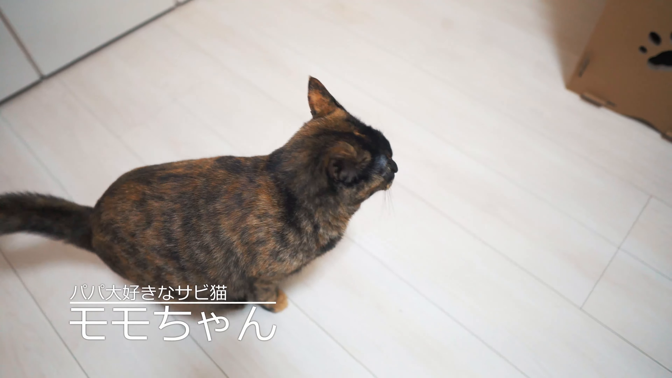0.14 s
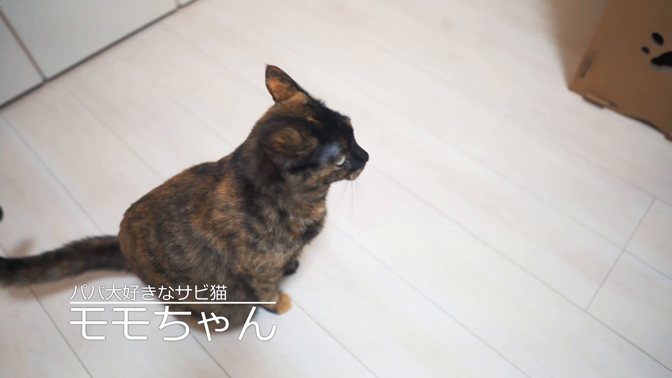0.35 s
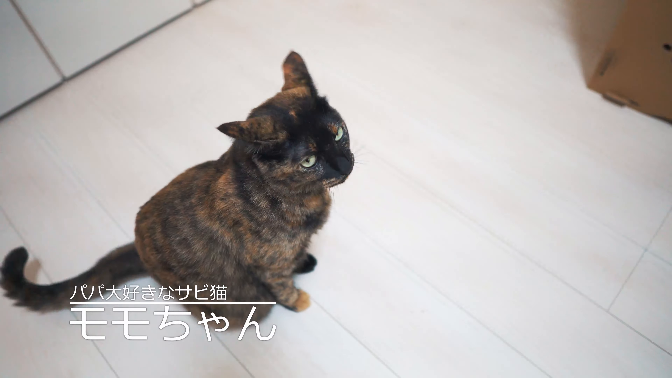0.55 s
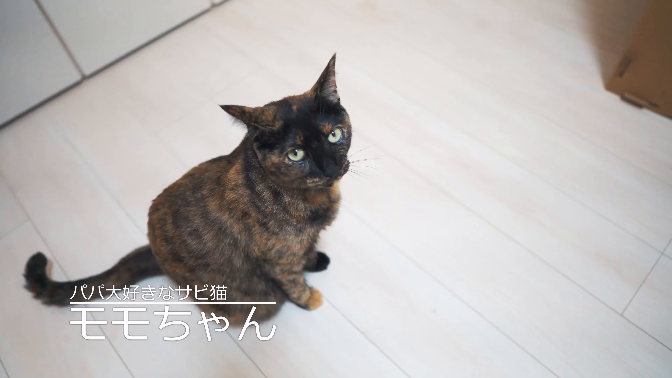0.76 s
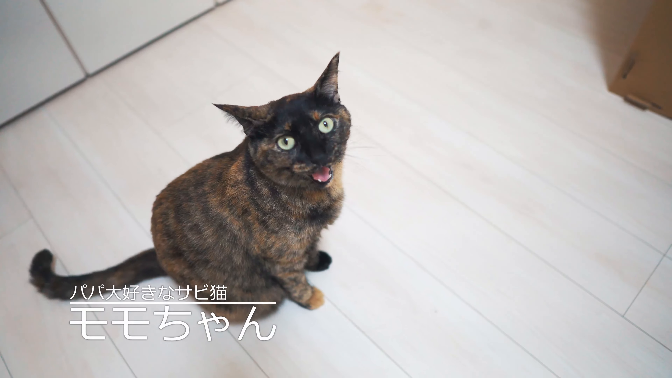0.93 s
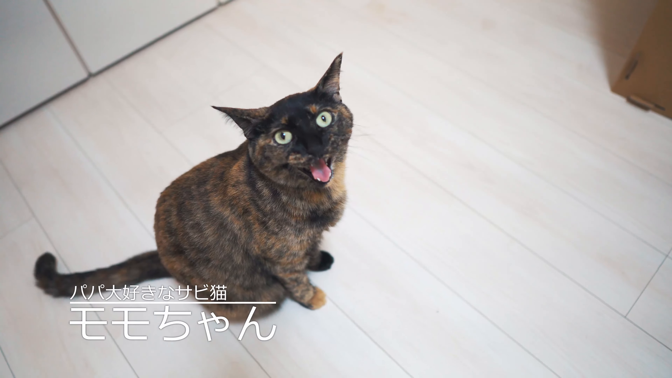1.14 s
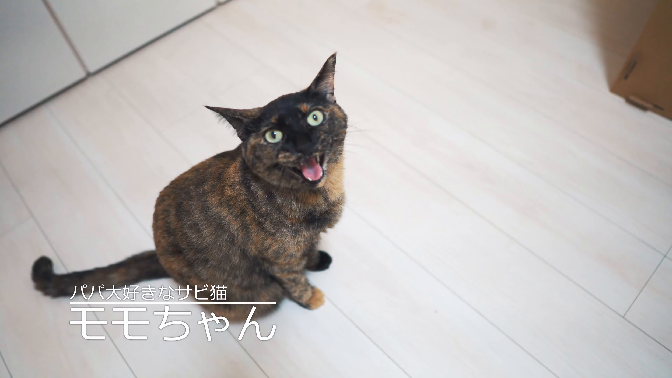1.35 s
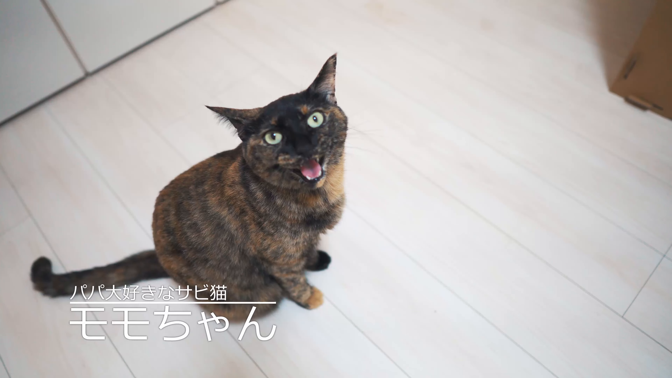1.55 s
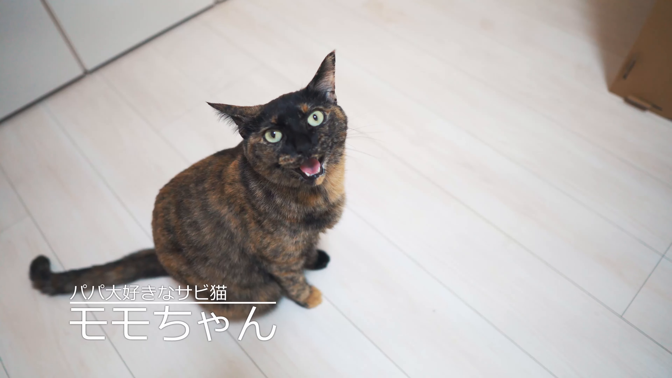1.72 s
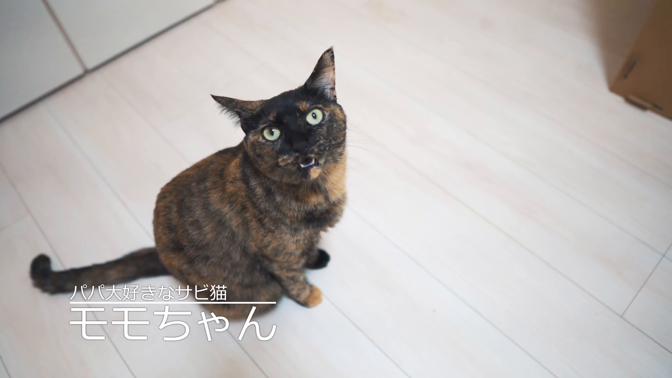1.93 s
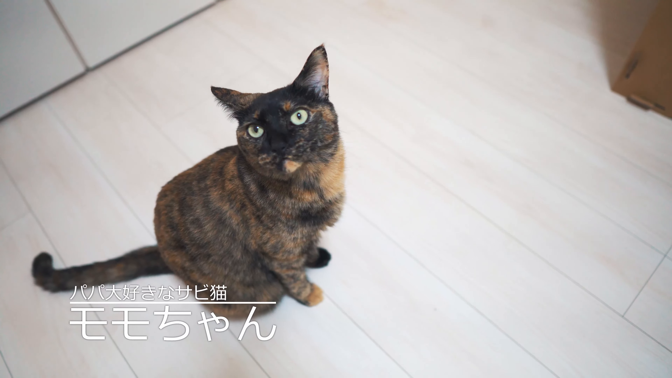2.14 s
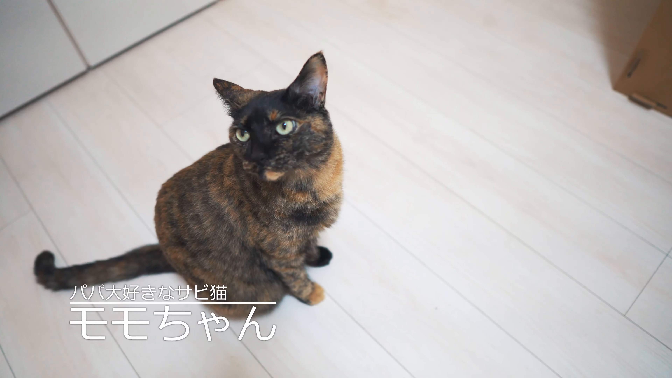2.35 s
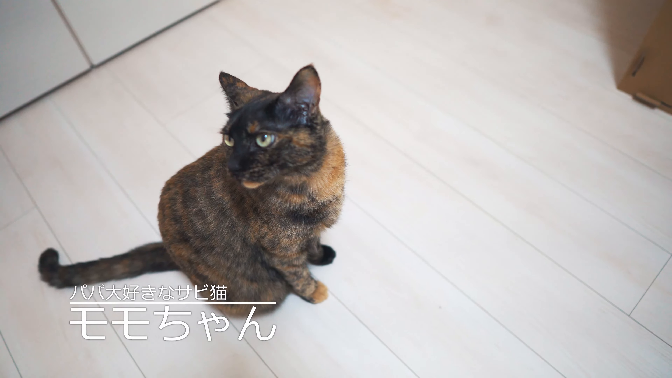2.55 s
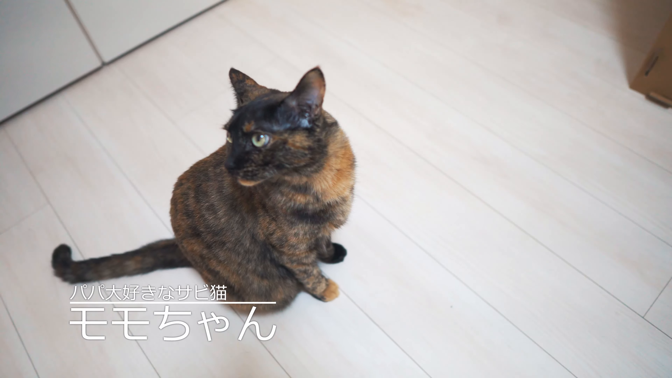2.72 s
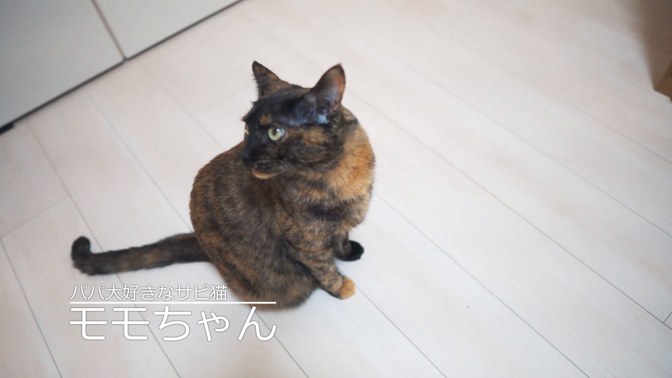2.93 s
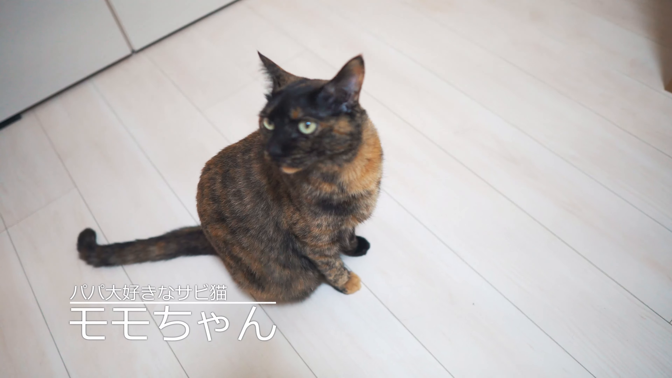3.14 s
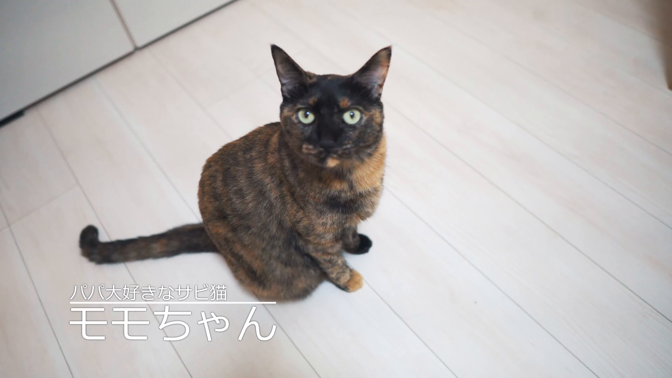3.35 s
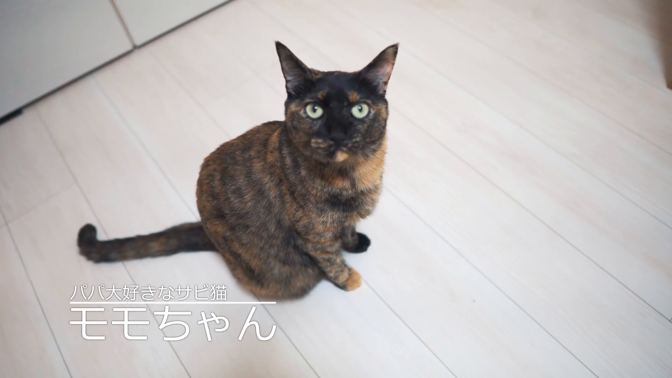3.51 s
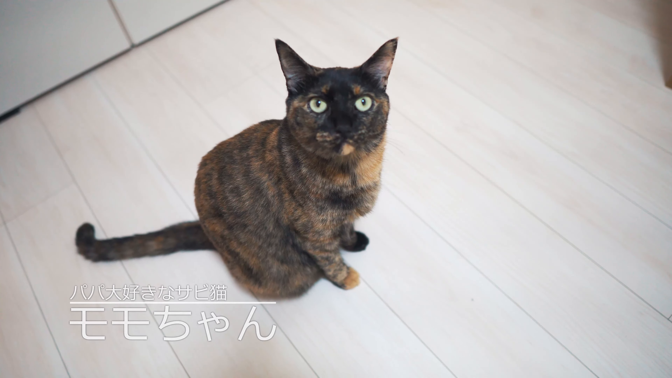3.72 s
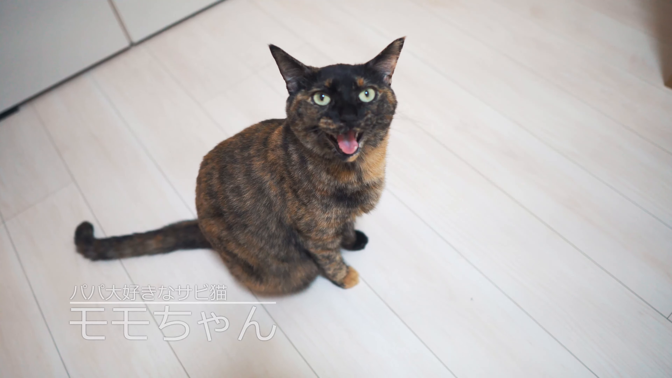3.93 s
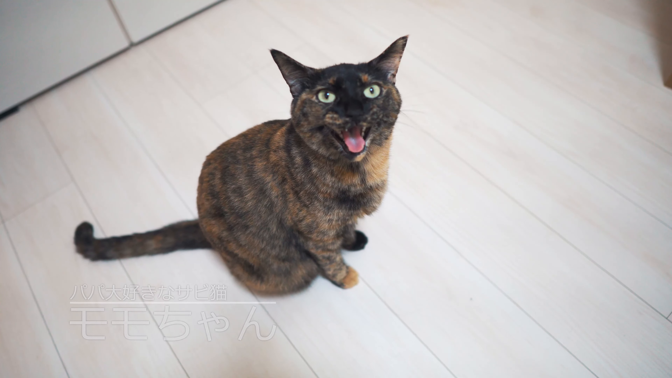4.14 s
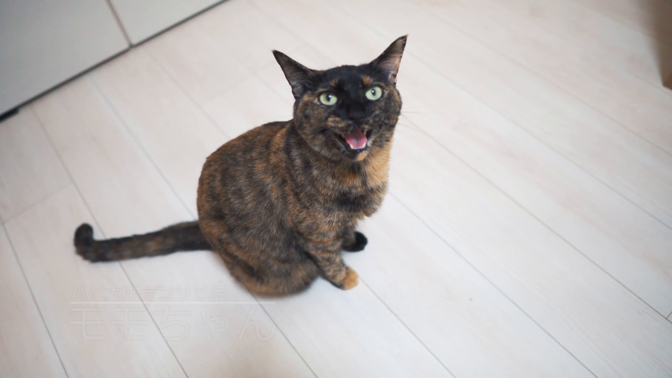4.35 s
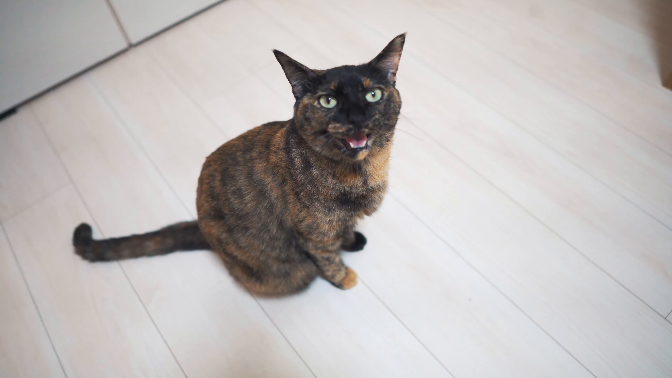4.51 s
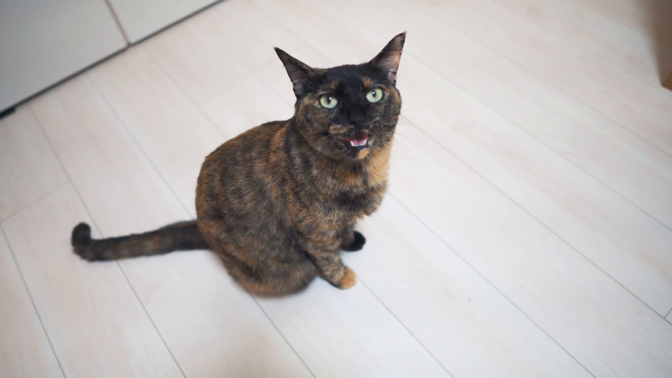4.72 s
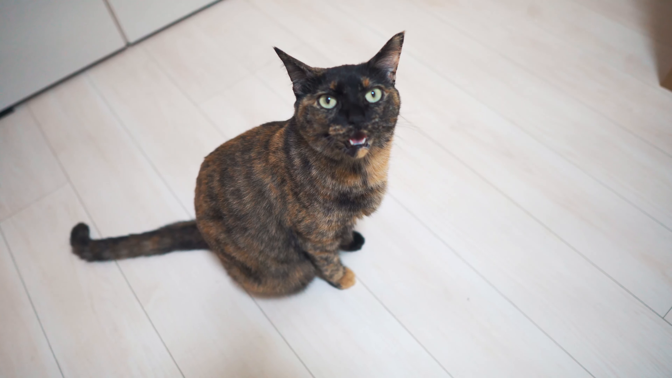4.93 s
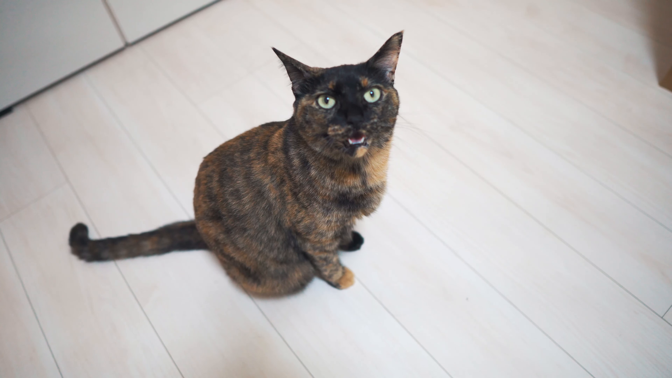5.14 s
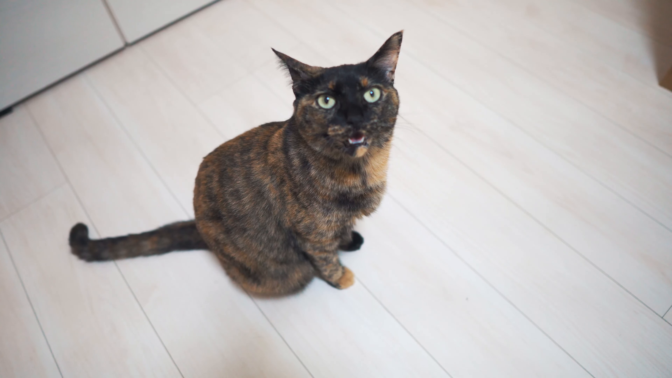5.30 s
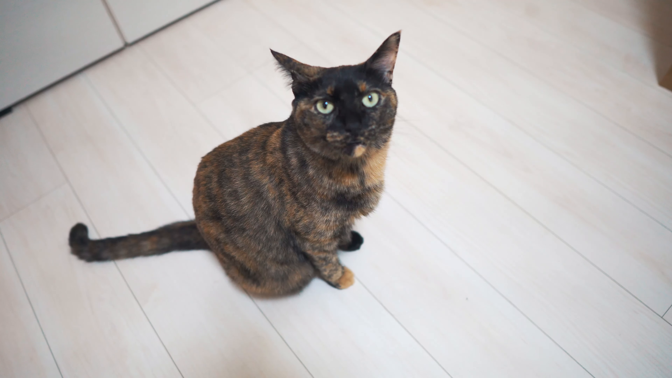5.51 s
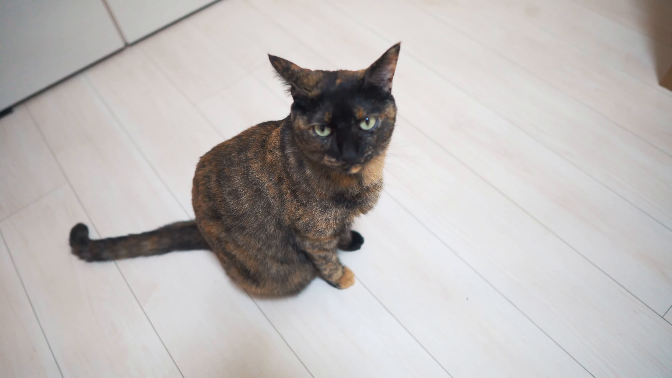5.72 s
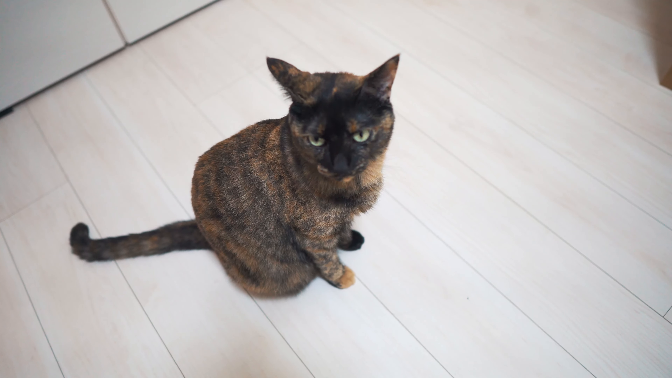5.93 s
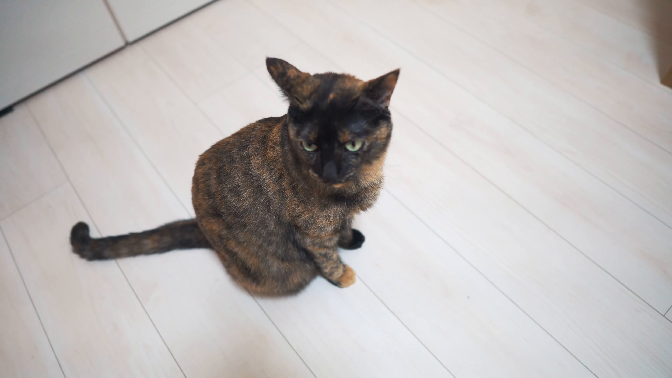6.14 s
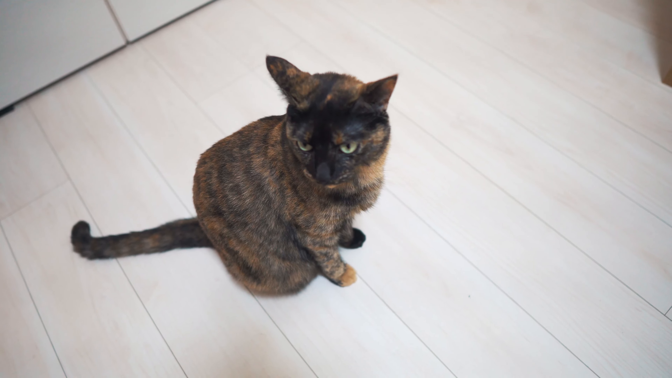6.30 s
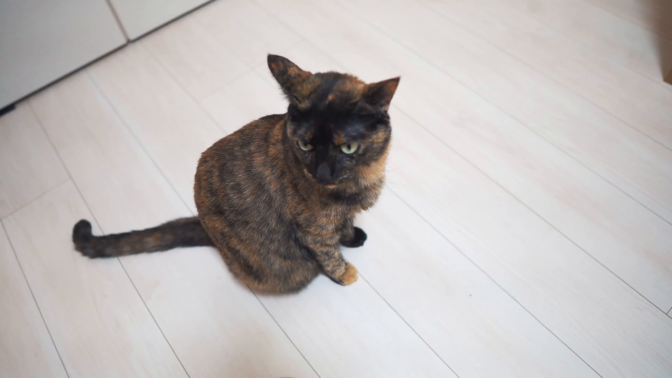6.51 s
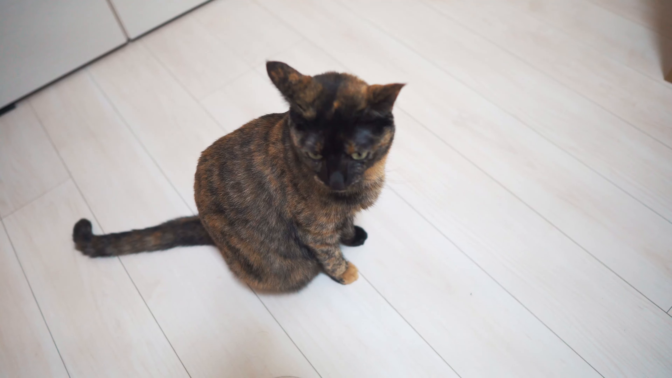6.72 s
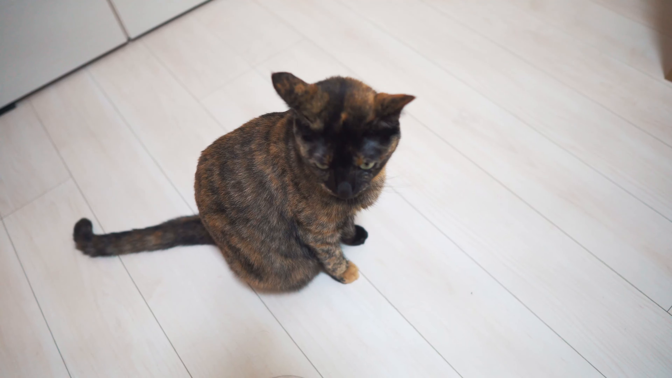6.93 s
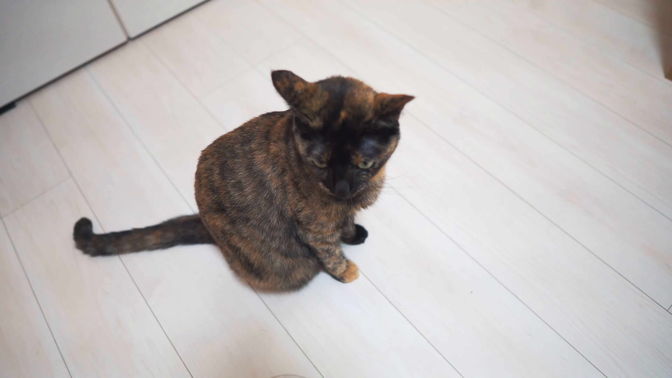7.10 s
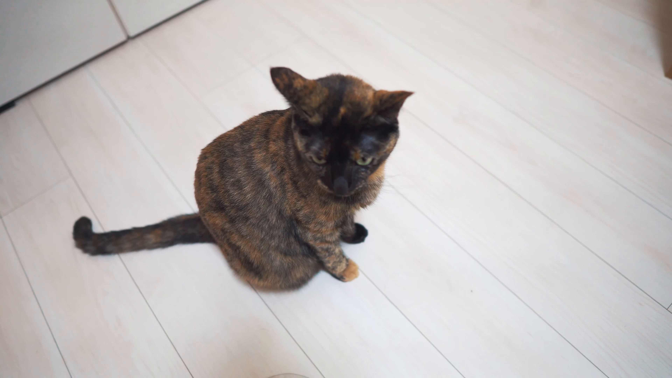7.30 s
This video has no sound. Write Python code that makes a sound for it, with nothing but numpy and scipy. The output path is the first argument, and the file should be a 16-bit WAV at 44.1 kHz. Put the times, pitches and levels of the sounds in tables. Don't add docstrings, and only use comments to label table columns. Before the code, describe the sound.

Two drawn-out, fairly high cat meows in a quiet room, the first strong and sustained, the second falling and fading, over faint air hum.

```python
import sys
import numpy as np
from scipy import signal
from scipy.fft import rfft, irfft, next_fast_len
from scipy.io import wavfile
from scipy.ndimage import uniform_filter1d

SR = 44100
rng = np.random.default_rng(int(sys.argv[2]) if len(sys.argv) > 2 else 0)


def int16_out(signal):
    q = np.round(np.clip(np.atleast_2d(signal).T, -1, 1) * 32767)
    wavfile.write(sys.argv[1], SR, q.astype(np.int16))


def invert_db(x):
    u = np.asarray(x, float) / 20
    return 10 ** u


N = 324600
CUTOFF_HZ = 15850


def rms_one(x):
    return x / np.sqrt(np.mean(x ** 2) + 1e-20)


def in_time(rows, t):
    s, *columns = np.transpose(rows)
    return [np.interp(t, s, c) for c in columns]


def at_hz(points, hz):
    point_hz, point_db = np.transpose(points)
    return np.interp(np.log(hz), np.log(point_hz), point_db)


def drift(rate_hz, size):
    r = np.exp(-2 * np.pi * rate_hz / SR)
    settle = 9000
    noise = rng.standard_normal(size + settle)
    return rms_one(signal.lfilter([1], [1, -2 * r, r * r], noise)[settle:])


def peak(hz, centre_hz, width_hz):
    return 1 / (1 + (2 * (hz - centre_hz) / width_hz) ** 2)


def shaped_noise(gain_at):
    size = next_fast_len(N)
    hz = np.maximum(np.arange(size // 2 + 1) * SR / size, 1)
    return rms_one(irfft(rfft(rng.standard_normal(size)) * gain_at(hz), size)[:N])


def swell(t, s, length_s):
    return np.exp(-(2 * (t - s) / length_s) ** 2)


def swells_db(t, rows):
    return sum(db * swell(t, s, length_s) for s, db, length_s in rows)


def hum():
    # frequency [Hz], density [dB per Hz].
    hum_points = [(26, -55.5), (45, -16), (75, -6), (124, -15), (233, 0.5), (317, -10), (401, -7.5),
                  (431, -5), (464, -6.5), (731, -9), (1070, -17), (1500, -22), (1950, -47), (3300, -120)]
    # frequency [Hz], density [dB per Hz].
    hiss_points = [(900, -15.5), (1400, -2), (2500, -4.5), (3800, -8.5), (4500, -14), (5500, -10.5),
                   (6800, -18.5), (8500, -20), (10500, -27.5), (12500, -31), (15800, -38)]
    # centre [Hz], width [Hz], level [dB].
    duct_rows = [(275, 28, -41), (449.5, 63, -43)]
    # start [s], depth [dB], recovery [s].
    duck_rows = [
        (-.5, 3.5, 3),
        (1.05, 6.5, 3.1),
        (4.0, 4, 0.75),
    ]
    level_db, duck_s = -37, 0.056
    t = np.arange(N) / SR
    air = invert_db(5.5) * shaped_noise(lambda hz: invert_db(at_hz(hum_points, hz)) * (hz > hum_points[0][0]))
    air += invert_db(-5.0) * shaped_noise(lambda hz: invert_db(at_hz(hiss_points, hz)) * (hz > hiss_points[0][0]))
    for centre_hz, width_hz, duct_db in duct_rows:
        duct_gain = invert_db(duct_db + 34.0 + 2.0 * drift(1.5, size=N))
        air += duct_gain * shaped_noise(lambda hz: peak(hz, centre_hz, width_hz))
    duck_db = np.zeros(N)
    for s, depth_db, recovery_s in duck_rows:
        since_s = np.maximum(t - s, 0)
        duck_db += depth_db * (1 - np.exp(-since_s / duck_s)) * np.exp(-since_s / recovery_s)
    return invert_db(level_db - duck_db - 3.5 + 0.16 * drift(1.1, size=N)) * air


def shake():
    # centre [s], length [s], sway level [dB], knock level [dB].
    regrip_rows = [
        (0.214, 0.46, -24.5, -40),
        (0.705, 0.35, -28, -71),
        (1.046, .15, -31, -62),
        (1.667, .08, -49, -45.5),
    ]
    sway_hz, sway_db, sway_waver_db = 10.7, -42, 1.5
    knock_db, knock_waver_db = -56.5, 3.5
    t = np.arange(N) / SR
    sway_gain = invert_db(sway_db + sway_waver_db * drift(2.0, size=N))
    knock_gain = invert_db(knock_db + knock_waver_db * drift(2.2, size=N))
    for s, length_s, grip_sway_db, grip_knock_db in regrip_rows:
        bump = swell(t, s, length_s)
        sway_gain += invert_db(grip_sway_db) * bump
        knock_gain += invert_db(grip_knock_db) * bump
    rate_hz = sway_hz * (1 + 0.029 * drift(2.13, size=N))
    sway = np.sqrt(2) * np.cos(2 * np.pi * np.cumsum(rate_hz) / SR)
    return sway_gain * sway + knock_gain * shaped_noise(lambda hz: peak(hz, 30, 22) ** 2)


def ticks():
    # start [s], peak [dB].
    tick_rows = [
        (.832, -51),
        (.908, -42),
        (3.796, -53),
    ]
    out = np.zeros(N)
    tail = np.exp(-np.arange(200) / SR / 0.0008)
    for s, peak_db in tick_rows:
        start = round(s * SR)
        out[start:start + 200] += invert_db(peak_db) * tail * rng.standard_normal(200)
    return signal.sosfilt(signal.butter(2, 2500, "high", fs=SR, output="sos"), out)


def line_heights(hz, since_s, throat_hz, nose_hz, throat_db, levels_db, jaw, lips, tongue):
    # frequency [Hz], level [dB].
    edge_points = [(5500, -28.5), (6800, 2.5), (7800, -3.5), (8800, -1), (10000, 0.5), (11500, -9.5),
                   (13500, 0), (15500, -9.5)]
    chest_hz, chest_width_hz, chest_bright_db = 897, 2100, -2
    throat_width_hz = 1500 * (0.61 + 1.74 * (1 - 0.61) * lips)
    mouth_hz, mouth_width_hz = 2970 + 1300 * tongue, 2110
    nose_hz = nose_hz + 1970 * np.maximum(0.55 - lips, 0)
    edge_db_per_octave = 1.1 * (throat_db + 14) + 5 * (lips - 0.65)
    edge_db = at_hz(edge_points, hz) + edge_db_per_octave * np.log2(hz / 7000)
    shapes = [peak(hz, throat_hz, throat_width_hz) ** 3,
              peak(hz, chest_hz, chest_width_hz) ** 3 * invert_db(chest_bright_db * np.log2(hz / chest_hz)),
              peak(hz, mouth_hz, mouth_width_hz) ** 3,
              peak(hz, nose_hz, 1400) ** 2,
              invert_db(edge_db) * (hz > edge_points[0][0])]
    heights = 0
    for shape, level_db in zip(shapes, levels_db):
        heights = heights + invert_db(level_db) * shape / np.sqrt(np.sum(shape ** 2, axis=0) / 2)
    cavity_db = 11 * peak(hz, 1182, 68)
    notch_db = -13 * np.maximum(2 * jaw - 0.6, 0) * peak(hz, 1100, 51)
    waver_db = [0.22 * min(k, 9) * drift(30.0, size=len(since_s)) for k in range(1, len(hz) + 1)]
    return heights * invert_db(cavity_db + notch_db) * invert_db(waver_db)


def meow(rows, hook_hz):
    # centre [s], rise [dB], length [s].
    surge_rows = [
        (4.53, 4, .07),
        (5.0, 2.5, 0.076),
        (5.316, 4.5, 0.026),
    ]
    # centre [s], added nose level [dB], length [s].
    nasal_rows = [
        (1.12, 15.5, 0.19),
        (4.45, 7.5, 0.38),
        (5.36, 7.5, 0.21),
    ]
    # centre [s], added rasp [dB], length [s].
    catch_rows = [(1.04, 6, .012), (1.07, 7, .012), (1.19, 5, .015), (1.27, 4, .25), (1.322, 10, .028),
                  (1.375, 5, .015), (1.446, 10, .008), (1.871, 13, .007), (4.2, 4, .25), (4.655, 8, .008)]
    attack_s, attack_db = 0.0081, -3
    release_s, release_db_per_s = 0.03, 700
    start_s, close_s = rows[0][0], rows[-1][0]
    start, stop = round(start_s * SR), round((close_s + release_s) * SR)
    t = np.arange(start, stop) / SR
    size, since_s = len(t), t - t[0]
    pitch_hz, effort_db, jaw, lips, tongue = in_time(rows, t)

    ends_db = attack_db * np.maximum(1 - since_s / attack_s, 0)
    ends_db = ends_db - release_db_per_s * np.maximum(t - close_s, 0)
    throat_db = effort_db + ends_db + swells_db(t, surge_rows)
    chest_db = -35 + 0.1134 * (pitch_hz - 646) + 0.2 * ends_db - throat_db
    mouth_db = -34 + 35 * lips
    nose_db = -46 + 0.15 * (throat_db + 12) + swells_db(t, nasal_rows) - throat_db
    edge_db = -53.5 + 16.5 * lips - 14 * np.exp(-since_s / 0.026)
    levels_db = [0, chest_db, mouth_db, nose_db, edge_db]

    pitch_hz = uniform_filter1d(pitch_hz, size=1000) * (1 + 0.0028 * drift(34.0, size=size))
    pitch_hz = pitch_hz + hook_hz * np.exp(-since_s / 0.004)
    order = np.arange(1, 26)[:, None]
    hz = order * pitch_hz
    throat_hz, nose_hz = 1874 + 955 * jaw, 5350
    heights = line_heights(hz, since_s, throat_hz, nose_hz, throat_db, levels_db, jaw, lips, tongue)
    turn = -0.7 + 2.36 * np.arctan((hz - throat_hz) / 500) + 2.4 * np.arctan((hz - nose_hz) / 900)

    rasp_db = -54 + 11.5 * lips + 10 * np.exp(-since_s / 0.008)
    rasp_db = rasp_db + 16 * np.exp(-np.maximum(close_s - t, 0) / 0.02)
    rasp_db = rasp_db + 2 * drift(40.0, size=size) + swells_db(t, catch_rows)
    leak = invert_db(rasp_db + 6.5) * shaped_noise(lambda f: peak(f, 5500, 4500) ** 3)[:size]
    early = 0.7 * invert_db(rasp_db) * drift(350.0, size=size)
    cycles = 2 * np.pi * np.cumsum(pitch_hz) / SR + early
    tone = np.sum(heights * (hz < CUTOFF_HZ) * np.cos(order * cycles - turn), axis=0)
    rasp = 1 + 0.12 * invert_db(rasp_db) * drift(300.0, size=size)
    flutter = invert_db(0.45 * drift(30.0, size=size))
    fade = np.minimum(1, np.minimum(since_s / 0.0015, (t[-1] - t) / 0.008))
    out = np.zeros(N)
    out[start:stop] = invert_db(throat_db) * (tone * rasp + leak) * flutter * fade
    return out


def puffs():
    # centre [s], level [dB], length [s], brightness [dB].
    puff_rows = [(.963, -30, .008, -14), (3.943, -26, .007, -14), (1.872, -48, .006, -3),
                 (1.96, -58, .08, 6), (1.994, -37, .02, -9), (2.04, -60, .06, 3), (4.22, -40, .09, -8),
                 (5.368, -39, .026, -6), (5.39, -43, .025, -2), (5.43, -57, .05, 5)]
    t = np.arange(N) / SR
    dark = shaped_noise(lambda hz: peak(hz, 3200, 3100) ** 3 + 2.4 * peak(hz, 760, 600) ** 2
                        + 0.5 * peak(hz, 1600, 1200) ** 2)
    bright = shaped_noise(lambda hz: peak(hz, 5550, 1200) ** 2 + 0.45 * peak(hz, 6000, 2500) ** 3
                          + 0.06 * peak(hz, 13500, 4000) ** 2)
    out = np.zeros(N)
    for s, level_db, length_s, bright_db in puff_rows:
        near = slice(round((s - 2 * length_s) * SR), round((s + 2 * length_s) * SR))
        air = dark[near] + invert_db(bright_db) * bright[near]
        out[near] += invert_db(level_db) * swell(t[near], s, length_s) * air
    return out


def room(x):
    t60_s, level_db, wall_cut_hz = 0.33, -11.5, 44000
    floor_s, floor_db = 0.0016, -21
    size = next_fast_len(N + SR)
    hz = np.arange(size // 2 + 1) * SR / size
    answer = 1 + invert_db(floor_db) * np.exp(-2j * np.pi * hz * floor_s)
    for k, lag_s in enumerate(rng.uniform(0.0082, 0.032, 10)):
        wall = 1 / (1 + 1j * hz / wall_cut_hz) ** (lag_s * 20)
        trip = invert_db(-60 * lag_s / t60_s) * np.exp(-2j * np.pi * hz * lag_s) * wall
        answer = answer + invert_db(level_db - 9) * (-1) ** k * trip / (1 - trip)
    return irfft(rfft(x, size) * answer, size)[:N]


def scene():
    # time [s], pitch [Hz], effort [dB], jaw opening [0-1],
    # lips apart [0-1], tongue forward [0-1].
    calls = [
        [(0.96, 685.3, -16, 0.73, 0.67, 0.97), (1.01, 707, -17.5, 0.7, 0.96, 0.31),
         (1.12, 690.4, -16, 0.73, 0.85, 0.5), (1.3, 657.7, -13, 0.73, 0.76, 0.55),
         (1.4, 629.7, -11.5, 0.73, 0.51, 0.74), (1.58, 613.3, -11.5, 0.66, 0.53, 0.43),
         (1.8, 619.6, -11.5, 0.61, 0.48, 0.5), (1.88, 622, -16.5, 0.37, 0.43, 0.6),
         (1.972, 625.6, -29, 0.38, 0.4, 0.56)],
        [(3.939, 706.7, -22, 0.77, 0.68, 0.74), (3.99, 706.6, -18.5, 0.67, 1, 0.5),
         (4.17, 627.5, -12.5, 0.69, 0.7, 0.56), (4.29, 600.7, -15, 0.59, 0.78, 0),
         (4.55, 590.4, -17, 0.46, 0.69, 0.03), (4.82, 605.1, -19.5, 0.33, 0.57, 0.16),
         (5.1, 634.1, -22, 0.43, 0.28, 0.77), (5.3, 626.2, -24.5, 0.4, 0.37, 0.5),
         (5.355, 594.5, -31.5, 0.4, 0.5, 0.9)],
    ]
    hooks_hz = (-45, 202)
    voice = sum(meow(rows, hook_hz) for rows, hook_hz in zip(calls, hooks_hz))
    cat = room(voice + puffs() + ticks())
    return (cat + hum() + shake())[None]


def top_cut(x):
    return signal.sosfilt(signal.butter(12, 15950, fs=SR, output="sos"), x)


def record(dry):
    cut = signal.ellip(12, 0.5, 60, CUTOFF_HZ, fs=SR, output="sos")
    mix = signal.sosfilt(cut, dry)
    return top_cut(mix)


dry = scene()
out = record(dry)
int16_out(out)
```